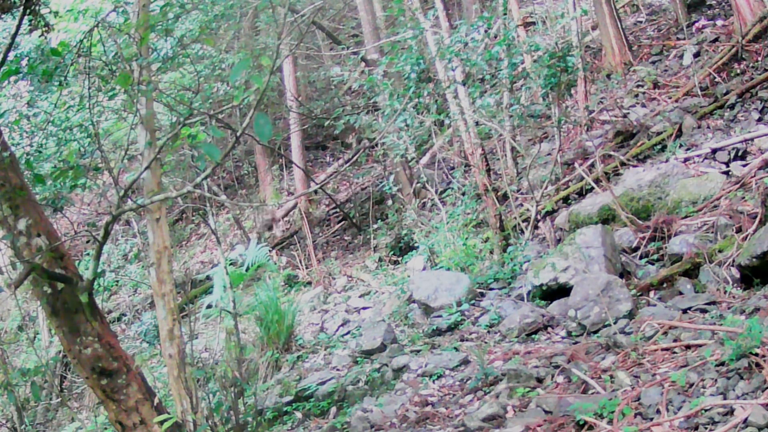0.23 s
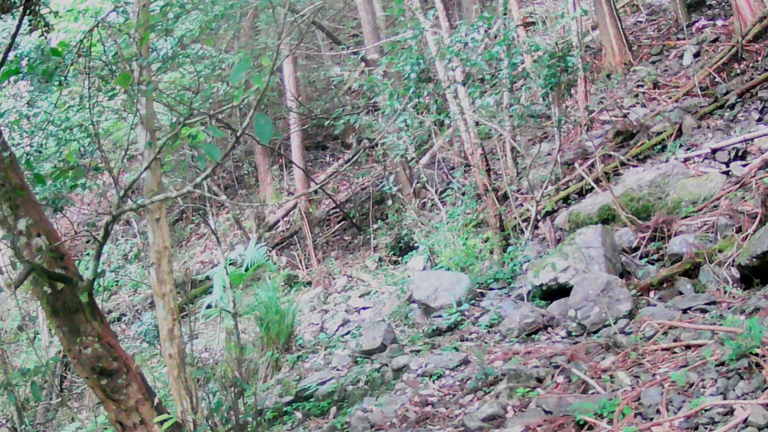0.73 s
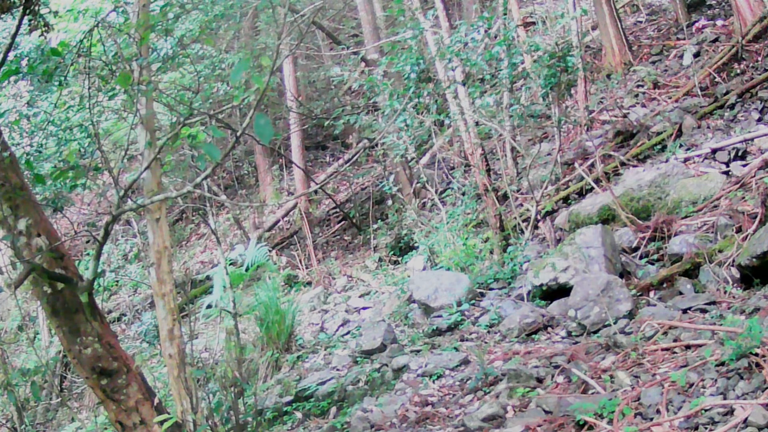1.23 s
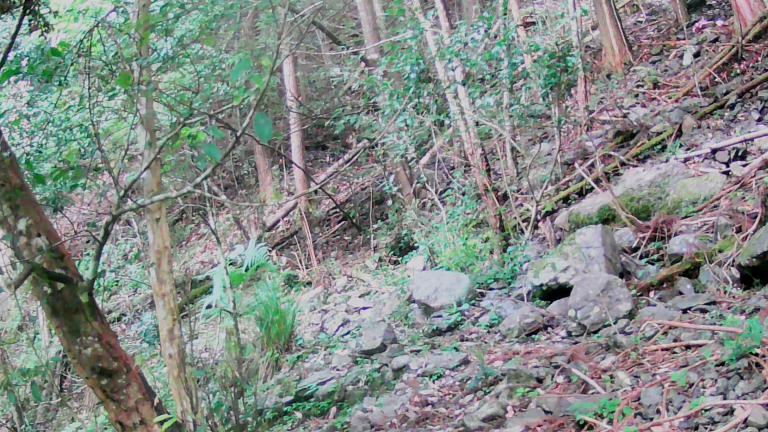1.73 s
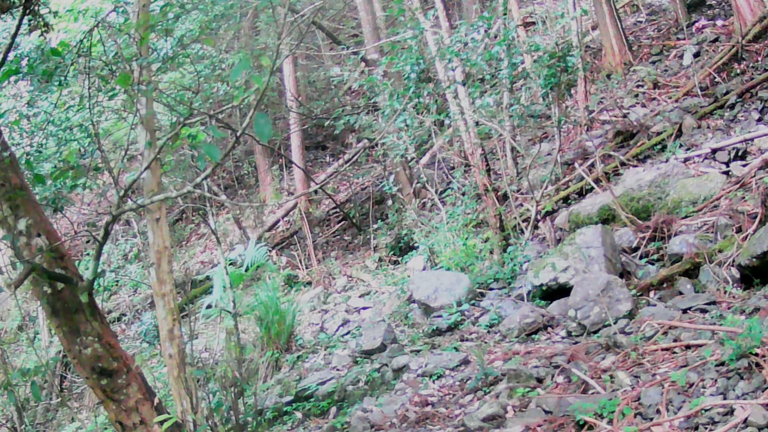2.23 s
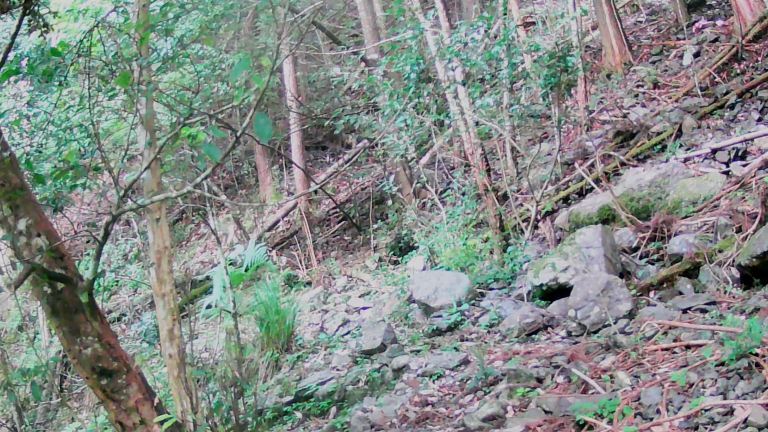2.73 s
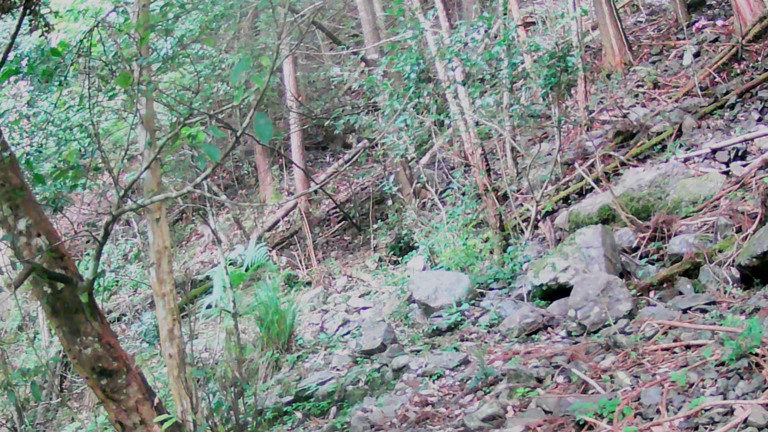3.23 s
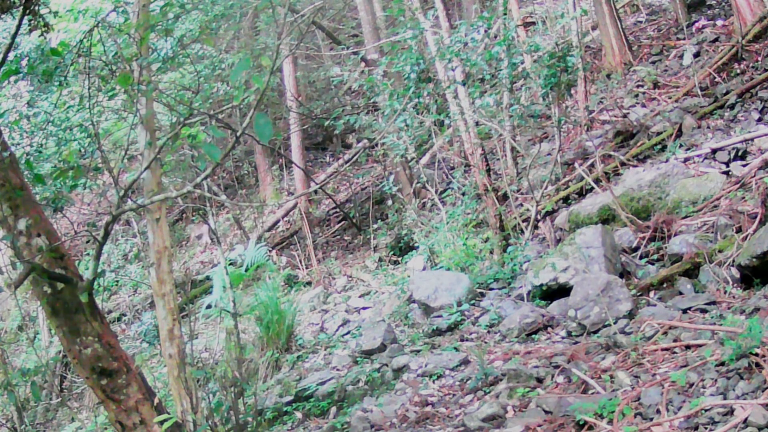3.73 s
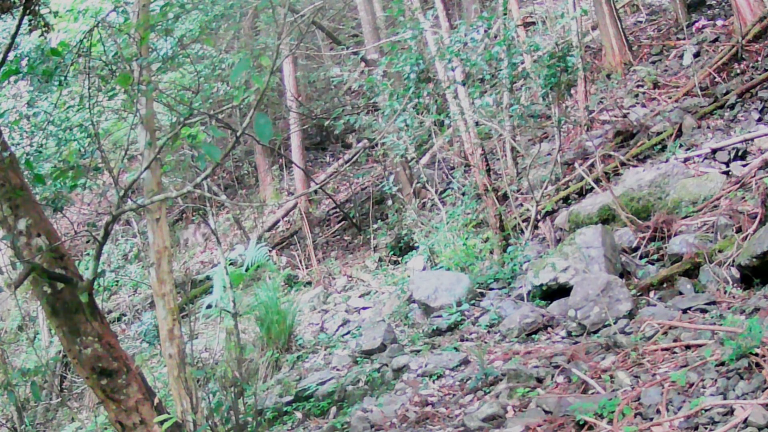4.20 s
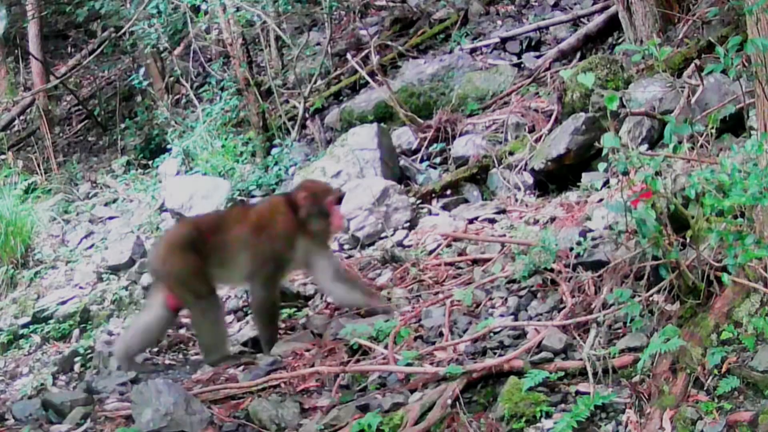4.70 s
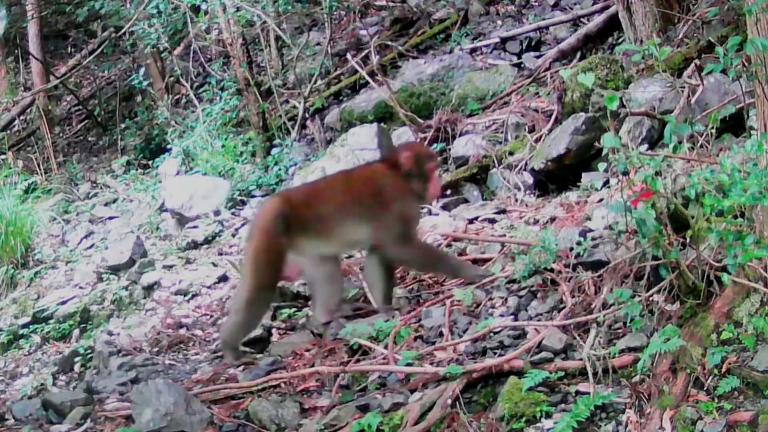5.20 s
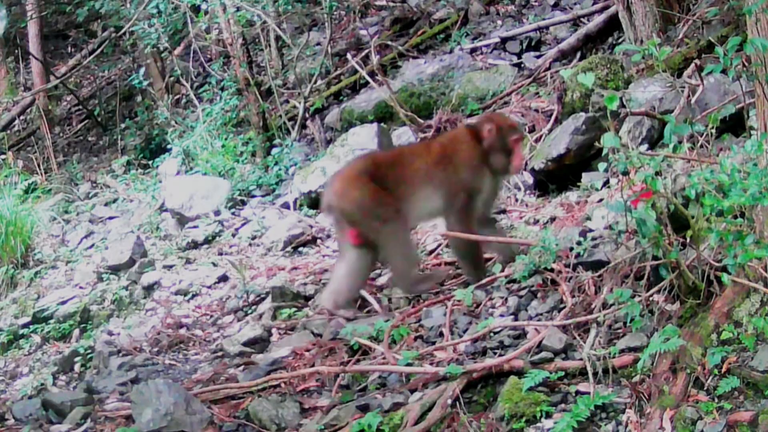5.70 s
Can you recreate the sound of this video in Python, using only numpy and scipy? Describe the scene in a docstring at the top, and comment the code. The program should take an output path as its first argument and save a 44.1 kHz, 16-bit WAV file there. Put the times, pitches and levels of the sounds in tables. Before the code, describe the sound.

Steady buzzing motor hum around a low pitch, with faint squeaky ringing above, stops abruptly into silence before a soft forest hush rises.

```python
"""Wooded slope: a small two-stroke engine, perhaps a brush cutter, drones as a sum of firing-rate multiples and noise.
It speeds up and is dragged down three times as the blade bites; hiss, sizzle and crunch are filtered noise.
Gliding sines whistle above, modes of the blade ring around the first bite and on after it, and knocks ring a stem.
The sound is cut dead; after a silence the quiet wood fades in: coloured noise, a faint hum, wind on the microphone."""
import sys
import numpy as np
from scipy import signal
from scipy.io import wavfile

SR = 44100
rng = np.random.default_rng(int(sys.argv[2]) if len(sys.argv) > 2 else 0)


def wav_out(sig):
    """Save sig, one row per channel (or a flat mono array), as 16-bit PCM at SR to the path in sys.argv[1]."""
    wavfile.write(sys.argv[1], SR, np.round(np.clip(np.atleast_2d(sig).T, -1, 1) * 32767).astype(np.int16))


N = 262395

# Engine speed. Each row: time in seconds, firings per second.
ENGINE_SPEED = [(0.04, 98.7), (0.135, 102.6), (0.345, 101.7), (0.415, 93.0), (0.495, 96.0), (0.545, 91.6),
                (0.605, 93.8), (0.765, 92.3), (0.895, 95.1), (0.98, 98.9), (1.03, 97.3), (1.095, 99.2),
                (1.15, 97.9), (1.265, 99.1), (1.295, 100.3), (1.595, 105.3), (1.69, 108.0), (1.785, 107.0),
                (1.97, 110.1), (2.04, 107.8), (2.135, 99.6), (2.165, 101.6), (2.25, 102.5), (2.32, 100.0),
                (2.41, 102.2), (2.485, 100.5), (2.61, 105.2), (2.695, 103.5), (2.78, 107.8), (2.88, 106.5),
                (2.955, 109.9), (3.055, 108.7), (3.18, 113.8), (3.265, 111.4), (3.355, 116.0),
                (3.42, 111.1), (3.52, 114.8), (3.6, 101.0), (3.63, 106.5), (3.735, 102.1), (3.82, 107.3),
                (3.915, 104.9), (4.03, 111.5), (4.085, 108.1), (4.225, 109.9), (4.385, 109.4)]
# Exhaust, housing and slope favour some pitches. Each row: pitch in Hz, base level in dB of a line there.
LINE_LEVELS = [(90, -36.5), (104, -34), (117, -35.5), (190, -74), (280, -61), (325, -56.5), (375, -58.5),
               (430, -54.5), (490, -64), (555, -52.5), (605, -58.5), (640, -52), (740, -54), (785, -54.5),
               (825, -53.5), (858, -57), (880, -72), (945, -70.5), (990, -60), (1040, -65), (1110, -61),
               (1180, -58), (1240, -55.5), (1300, -56), (1370, -66.5), (1500, -62), (1650, -72),
               (2100, -73.5)]
# Shape of the firing pulse. Each row: multiple of the firing rate, added level in dB; others 0.
PULSE_SHAPE = [(5, 3), (6, -1), (7, 2.5), (8, 4.5), (10, 3), (11, -2), (13, -5), (15, 4)]
# Swing of the lines. Each row: time in seconds, multiples 1-5 (thump) in dB, 6-9 (buzz) in dB, 10 up (rasp) in dB.
LINE_SWING = [(0, -2, -1.5, -6.5), (.3, -1.3, -3, 1.5), (.55, -.6, 1, -2.5), (.85, -0.7, 2.5, 2),
              (1.1, -2, -1.5, -1.5), (1.4, 0, 1, -1.5), (1.8, -0.2, -4, 1.3), (2.2, 0.2, 2, 3.5),
              (2.5, 1.2, 3.5, 2), (2.75, -0.5, 1, 5.5), (3.0, -1, -1, 1), (3.2, 0.5, -2, 2.5),
              (3.45, 0.8, -5.5, 5.5), (3.65, -0.5, 1.5, 3.5), (3.85, 0.7, 3, 5.5), (4.1, -1, 2.5, 6),
              (4.25, -1, -2, 4.5), (4.42, 2, 2, -0.5)]
# Engine noise scattered by the trees. Each row: frequency in Hz, relative density in dB per Hz.
ROAR_SPECTRUM = [(76, -26.5), (130, -13.5), (158, -19), (306, -16), (457, -20), (771, -16.5), (918, -23),
                 (1230, -17.5), (1690, -27), (2080, -23), (2270, -29), (4730, -46), (6150, -32.5),
                 (7320, -41), (8420, -58), (10900, -88), (18500, -120)]
# The blade bites. Each row: time in seconds, crunch level in dB.
BLADE_BITES = [(0.42, -55), (2.065, -56.5), (3.6, -53.5)]
# Hiss of the teeth in the brush. Each row: time in seconds, level in dB, centre in Hz.
TEETH_HISS = [(0, -74, 2807), (.3, -65, 2854), (.45, -73, 2892), (.9, -79.5, 2767), (1.9, -71.5, 2885),
              (1.99, -67, 2980), (2.02, -56, 2974), (2.14, -57, 2852), (2.2, -61.5, 2787),
              (2.4, -63.5, 2719), (2.5, -65.5, 2680), (3.35, -72.5, 3126), (3.5, -59, 2982),
              (3.58, -56, 2917), (3.635, -54, 2847), (3.66, -60.5, 2733), (3.8, -63.5, 2693),
              (4.0, -72, 2880), (4.42, -64.5, 2877)]
# Sizzle near 4 kHz. Each row: time in seconds, level in dB.
SIZZLE_LEVELS = [(0, -87), (.1, -71), (.22, -72), (.48, -87.5), (.8, -67), (.93, -76), (1.1, -81),
                 (1.19, -67), (1.35, -68), (2.09, -70.5), (2.7, -72), (3.17, -77), (3.92, -80),
                 (4.15, -80.5), (4.42, -76)]
# Wind swells and lulls. Each row: time of the middle in seconds, change of the wind level in dB.
WIND_SWELLS = [(1.701, -1), (5.3, 2), (5.63, -2), (5.79, -3)]
# Thin whistles. Each row: start in seconds, end in seconds, start in Hz, end in Hz, level in dB.
WHISTLE_GLIDES = [(0.04, 0.27, 2760, 2780, -67), (0.09, 0.34, 4285, 4240, -66),
                  (0.13, 0.31, 5030, 4980, -71), (0.2, 0.27, 4080, 4070, -74),
                  (0.65, 0.74, 4880, 4870, -77), (0.7, 0.77, 4160, 4150, -75),
                  (0.82, 0.93, 3410, 3390, -75), (0.86, 0.98, 5000, 4990, -78),
                  (0.27, 0.35, 4430, 4420, -73), (0.28, 0.38, 3310, 3290, -71),
                  (0.34, 0.57, 3030, 3020, -67), (0.62, 0.67, 4390, 4370, -75),
                  (0.86, 0.95, 4050, 4040, -76), (1.25, 1.42, 4260, 4240, -75),
                  (0.65, 0.71, 3830, 3760, -70), (0.75, 0.86, 3930, 3950, -74),
                  (0.84, 0.92, 3580, 3570, -74), (0.92, 1.15, 3320, 3320, -76),
                  (1.42, 2.3, 4250, 4270, -80), (1.3, 2.75, 4450, 4420, -81), (3.28, 3.42, 3320, 3220, -70),
                  (3.44, 3.55, 3310, 3200, -69), (3.92, 3.99, 3340, 3420, -70),
                  (3.93, 4.06, 3580, 3550, -72), (3.93, 3.975, 4070, 4070, -71),
                  (3.985, 4.09, 4085, 4060, -67), (3.93, 4.07, 4460, 4420, -70),
                  (3.97, 4.1, 4790, 4800, -74), (3.97, 4.13, 3910, 3920, -71),
                  (4.08, 4.28, 4270, 4410, -72), (4.07, 4.14, 3090, 2960, -66),
                  (4.08, 4.18, 4990, 5040, -72), (4.14, 4.32, 5190, 5350, -71),
                  (4.34, 4.43, 5400, 5470, -72), (3.93, 4.0, 4250, 4230, -73), (4.03, 4.1, 4560, 4640, -73),
                  (4.14, 4.2, 3570, 3620, -74), (4.33, 4.42, 3890, 3950, -75),
                  (4.05, 4.16, 4090, 4130, -74), (4.23, 4.36, 4180, 4295, -69),
                  (4.365, 4.42, 4300, 4340, -70), (4.25, 4.38, 3020, 3010, -67),
                  (4.23, 4.43, 4920, 5090, -71)]
# Blade modes. Each row: offset in Hz from the ringing pitch, relative level in dB.
DISC_MODES = [(-33, 0), (32, 0), (120, -10)]
# The disc rings around the first bite and on after it. Each row: time in seconds, level in dB, pitch in Hz.
DISC_RINGING = [(.29, -72, 2800), (.335, -53, 2720), (.36, -55, 2640), (.42, -59, 2650), (.47, -61, 2660),
                (.52, -54, 2670), (.575, -54, 2650), (.64, -60, 2635), (.69, -62, 2650), (.76, -57, 2645),
                (.83, -58, 2655), (.9, -65, 2670), (.99, -69, 2680), (1.07, -59, 2670), (1.13, -60, 2670),
                (1.2, -68, 2690), (1.3, -63, 2700), (1.4, -72, 2700)]
# Shoves of air on the microphone, a dip then a rise. Each row: centre in seconds, peak in dB, half length in seconds.
AIR_BUFFETS = [(1.697, -30.5, 0.013), (5.272, -53, 0.0076), (5.415, -44, 0.0042), (5.597, -41, .013),
               (5.672, -42, 0.017), (5.81, -48, 0.0063)]
# The blade strikes a stem. Each row: time in seconds, relative strike level in dB.
STEM_KNOCKS = [(3.5885, -39), (3.5908, -36.5), (3.5965, -35.5), (3.6005, -38), (3.6045, -42)]
# Stem modes. Each row: frequency in Hz, relative level in dB, time to fall 60 dB in seconds.
STEM_MODES = [(1100, 3, 0.008), (1250, 2, 0.008), (1500, 1, 0.007), (1800, 1, 0.005), (2300, 3, 0.004)]
# Hush of the wood. Each row: frequency in Hz, relative density in dB per Hz.
HUSH_SPECTRUM = [(59, -37), (100, -12), (171, -7), (258, -9), (322, -14.5), (395, -11.5), (433, -9.5),
                 (475, -21.5), (605, -13), (798, -19), (1810, -23.5), (4740, -44.5), (5920, -36),
                 (7530, -38), (8420, -47), (10900, -77), (18500, -120)]
# Faint far hum in the hush. Each row: frequency in Hz, width in Hz, level in dB relative to the hush.
FAR_HUM_TONES = [(166, 5, -5), (332.6, 8.1, -10.5)]
# The quiet wood fades in. Each row: time in seconds, hush change in dB, wind change in dB.
QUIET_FADE = [(5.05, -20, -25), (5.18, -10.5, -10.5), (5.4, -5.5, -8.5), (5.6, -1.5, -1), (5.75, 0.5, -1),
              (5.95, -0.5, -5)]

HUNT_HZ = 0.2   # spread of the random unsteadiness in firing rate
SHARED_SLIP_RAD, OWN_SLIP_RAD, RASP_SLIP_RAD = 0.5, 0.7, 0.6   # phase wander: all together, each line, rasp
RASP_BREAKS_DB, RASP_BREAKS_PER_S = 2.4, 7.0   # the lines from the tenth up come and go
ROAR_DB, BITE_ROAR_DB = -49, 1.5   # base level; swell in a bite
ROAR_FOLLOWS = 0.13   # share of the rasp's swing
BAND_HZ, BAND_WIDTH_HZ, BAND_DB = 2120, 57, -66   # steady hiss in the drone
BITE_RISE_DB_PER_S, BITE_FALL_DB_PER_S = 110, 65
TEETH_HALF_WIDTH_HZ, FREE_CRUNCH_DB = 160, -65   # crunch floor between bites
WIND_DB, SWELL_HALF_S = -48.5, 0.045
HUSH_DB, BREEZE_DB = -52.5, -52   # levels before the fade
SILENT_FROM_S, SILENT_TO_S = 4.4282, 5.0535
PORT_HZ, PORT_WIDTH_HZ, PORT_DEPTH = 4910, 1500, 0.57   # depth 0-1 of the band the housing cancels
MIC_TOP_HZ, HISS_DB, CUTOFF_HZ = 7480, -81, 15700

T_S = np.arange(N) / SR


def amp(db):
    """Decibels to gain."""
    return 10 ** (np.asarray(db) / 20)


def rms_one(x):
    """Scale to rms 1."""
    return x / np.sqrt(np.mean(x ** 2) + 1e-20)


def in_time(rows):
    """Columns of a curve table, one value a sample."""
    times_s, *columns = np.transpose(rows)
    return [np.interp(T_S, times_s, column) for column in columns]


def drift(rate_hz):
    """Slow chance of spread 1: noise at every 40th sample through a double one-pole low-pass."""
    r = np.exp(-2 * np.pi * rate_hz * 40 / SR)
    white = rng.standard_normal(N // 40 + 2002)
    slow = signal.lfilter([1], [1, -2 * r, r * r], white)[2000:]   # drop the run-in
    return np.interp(np.arange(N) / 40, np.arange(len(slow)), rms_one(slow))


def filtered(x, order, hz, kind="low"):
    """Butterworth filter."""
    return signal.sosfilt(signal.butter(order, hz, kind, fs=SR, output="sos"), x)


def resonance(x, hz, width_hz):
    """Two-pole band-pass with gain 1 on top."""
    r = np.exp(-np.pi * width_hz / SR)
    poles = [1, -2 * r * np.cos(2 * np.pi * hz / SR), r * r]
    return signal.lfilter(np.array([1, 0, -1]) * (1 - r * r) / 2, poles, x)


def narrow_noise(white, hz, width_hz):
    """Noise through the same resonance twice; rms 1."""
    return rms_one(resonance(resonance(white, hz, width_hz), hz, width_hz))


def phase(hz):
    """Phase in radians of a varying frequency."""
    return 2 * np.pi * np.cumsum(hz) / SR


def coloured(spectrum, patchy_db):
    """Noise of the given spectrum in third-octave bands, each flickering a little; rms 1."""
    hz, db = np.transpose(spectrum)
    out, together = 0, drift(3.0)
    edges_hz = 100 * 2 ** np.arange(0, 6.6, 1 / 3)
    white = rng.standard_normal((2, N))
    for k, (low_hz, high_hz) in enumerate(zip(edges_hz, edges_hz[1:])):
        band = filtered(white[k % 2], 2, [low_hz, high_hz], "band")   # neighbours use separate noise
        level_db = np.interp(np.log(low_hz * high_hz) / 2, np.log(hz), db)
        flicker_db = patchy_db * (0.4 * together + drift(23))
        out = out + amp(level_db + flicker_db) * band
    return rms_one(out)


def bite():
    """Gain 0-1 of each bite: climbs and sinks linearly in dB."""
    gains = []
    for s, _ in BLADE_BITES:
        since_s = T_S - s
        gains.append(amp(np.where(since_s < 0, BITE_RISE_DB_PER_S * since_s, -BITE_FALL_DB_PER_S * since_s)))
    return np.array(gains)


def firing_lines(turn, rate, swings_db):
    """A line at each multiple of the firing rate; echoes off the slope make the upper ones fade and slip."""
    thump_db, buzz_db, rasp_db = swings_db
    pulse_db = {round(k): db for k, db in PULSE_SHAPE}
    out, shared_slip = np.zeros(N), SHARED_SLIP_RAD * drift(0.9)
    for k in range(1, 19):
        swing_db = thump_db if k < 6 else buzz_db if k < 10 else rasp_db
        level_db = np.interp(k * rate, *np.transpose(LINE_LEVELS)) + pulse_db.get(k, 0) + swing_db
        if k == 1:
            slip = 0
            flutter_db = 0.45 * drift(13)
        else:
            slip = 0.036 * (k - 1) * drift(4.6) + OWN_SLIP_RAD * drift(0.98) + shared_slip
            flutter_db = 1.9 * drift(34) + 0.62 * drift(1.8)
        if k >= 10:
            flutter_db = flutter_db + RASP_BREAKS_DB * (drift(RASP_BREAKS_PER_S) - 1)
            slip = slip + RASP_SLIP_RAD * drift(6.9)
        out += np.sqrt(2) * amp(level_db + flutter_db) * np.cos(k * turn + slip)
    return out


def roar(turn, rasp_db):
    """Scattered engine noise whose lower part swells at each firing."""
    noise = coloured(ROAR_SPECTRUM, patchy_db=1.0)
    puffed = noise + 0.32 * np.cos(turn) * filtered(noise, 2, 2500)
    swell_db = ROAR_FOLLOWS * rasp_db + BITE_ROAR_DB * bite().sum(axis=0)
    return amp(ROAR_DB + swell_db) * puffed


def engine():
    """Firing lines, scattered roar and a steady narrow hiss."""
    rate = in_time(ENGINE_SPEED)[0] + HUNT_HZ * drift(14.8)
    swings_db, turn = in_time(LINE_SWING), phase(rate)
    band = narrow_noise(rng.standard_normal(N), BAND_HZ, BAND_WIDTH_HZ)
    return firing_lines(turn, rate, swings_db) + roar(turn, swings_db[2]) + amp(BAND_DB) * band


def blade():
    """Teeth in the brush: a hiss whose centre wanders, sagging in the second and third bites; sizzle; crunch."""
    hiss_db, centre_hz = in_time(TEETH_HISS)
    white = rng.standard_normal((4, N))
    spread = filtered(white[:2], 2, TEETH_HALF_WIDTH_HZ)
    turn = phase(centre_hz)
    hiss = rms_one(spread[0] * np.cos(turn) + spread[1] * np.sin(turn))   # noise moved up to the centre
    sizzle = rms_one(filtered(white[2], 4, [3600, 4900], "band"))
    crunch = rms_one(filtered(white[3], 2, [1400, 2300], "band"))
    crunch_gain = amp(FREE_CRUNCH_DB) + amp(np.transpose(BLADE_BITES)[1]) @ bite()
    return (amp(hiss_db + 1.3 * drift(30)) * hiss
            + amp(in_time(SIZZLE_LEVELS)[0] + 1.1 * drift(8.7)) * sizzle
            + amp(2.5 * drift(2.8)) * crunch_gain * crunch)


def wind():
    """Rumble at the microphone port, strongest at the very bottom, with a few brief swells and lulls."""
    low = filtered(rng.standard_normal(N), 2, [8, 85], "band")
    low = filtered(low, 1, 14)
    swells_db = sum(db * np.exp(-((T_S - s) / SWELL_HALF_S) ** 2) for s, db in WIND_SWELLS)
    return amp(WIND_DB + swells_db + 2.0 * drift(2.9)) * rms_one(low)


def whistles():
    """Near sines that glide, with soft ends and a slight waver."""
    out, waver = np.zeros(N), drift(25)
    for start_s, end_s, from_hz, to_hz, db in WHISTLE_GLIDES:
        i, j = round(start_s * SR), round(end_s * SR)
        turn = phase(np.linspace(from_hz, to_hz, j - i))
        height = np.sqrt(2) * amp(db + 2.0 * waver[i:j]) * signal.windows.tukey(j - i, 0.3)
        waver_rad = 0.3 if from_hz > 3450 else 0.9   # the lower ones are rougher
        out[i:j] += height * np.sin(turn + waver_rad * waver[i:j])
    return out


def disc():
    """Modes of the blade, kept ringing and fluttering by the brush that strokes it."""
    level_db, pitch_hz = in_time([(0, -90, 2800), *DISC_RINGING, (1.7, -90, 2700)])
    modes = 0
    for offset_hz, db in DISC_MODES:
        flutter = amp(db + 2.4 * drift(40))
        modes = modes + flutter * np.sin(phase(pitch_hz + offset_hz) + 0.8 * drift(25))
    return amp(level_db) * rms_one(modes)


def buffets():
    """Each shove pulls the diaphragm one way, then the other."""
    out = 0
    for s, db, half_s in AIR_BUFFETS:
        x = (T_S - s) / half_s
        out = out + amp(db) * x * np.exp((1 - x ** 2) / 2)
    return out


def knocks():
    """Soft blows ring the modes of the stem."""
    clicks, out = np.full(N, 1e-18), 0
    for s, db in STEM_KNOCKS:
        clicks[round(s * SR)] = amp(db + 6.5)
    soft = resonance(resonance(clicks, 1200, 450), 1400, 1000) * 17   # the contact lasts a few milliseconds
    for hz, db, t60_s in STEM_MODES:
        r, w = amp(-60 / (t60_s * SR)), 2 * np.pi * hz / SR
        out = out + signal.lfilter([0, amp(db - 25) * np.sin(w)], [1, -2 * r * np.cos(w), r * r], soft)
    return out


def far_hum():
    """Two unsteady low tones: noise through narrow resonances."""
    white = rng.standard_normal(N)
    return sum(amp(db) * narrow_noise(white, hz, width_hz) for hz, width_hz, db in FAR_HUM_TONES)


def quiet_wood(rumble):
    """Hush, far hum, wind rumble and a lighter low breeze noise fade in."""
    hush_db, wind_db = in_time(QUIET_FADE)
    breeze = rms_one(filtered(rng.standard_normal(N), 2, [25, 95], "band"))
    air = rumble + amp(BREEZE_DB + 1.5 * drift(9.8)) * breeze
    hush = coloured(HUSH_SPECTRUM, patchy_db=0.8)
    return amp(wind_db) * air + amp(HUSH_DB + hush_db) * (hush + far_hum())


def scene():
    """Engine part, then the quiet wood, with buffets in both."""
    rumble = wind()
    first = engine() + blade() + rumble + whistles() + disc() + knocks()
    second = quiet_wood(rumble)
    return np.where(T_S < (SILENT_FROM_S + SILENT_TO_S) / 2, first, second)[None] + buffets()


def record(dry):
    """Housing notch, narrow microphone band, recorder hiss, the muted gap, the cut at the top."""
    mic = dry - PORT_DEPTH * resonance(dry, PORT_HZ, PORT_WIDTH_HZ)
    mic = filtered(mic, 10, MIC_TOP_HZ)
    hissy = mic + amp(HISS_DB) * rng.standard_normal(N)
    heard = hissy * ((T_S < SILENT_FROM_S) | (T_S > SILENT_TO_S))
    return signal.sosfilt(signal.cheby2(20, 50, CUTOFF_HZ, fs=SR, output="sos"), heard)


dry = scene()
out = record(dry)
wav_out(out)
```